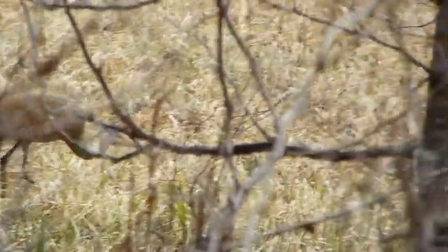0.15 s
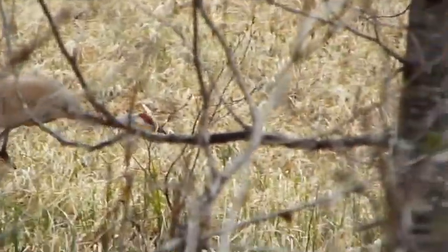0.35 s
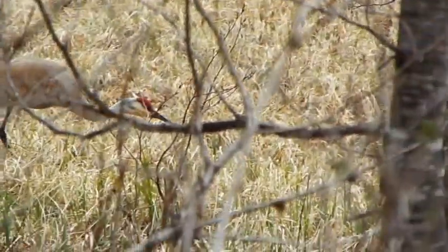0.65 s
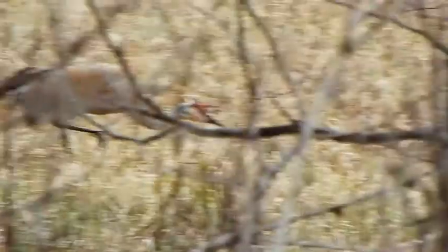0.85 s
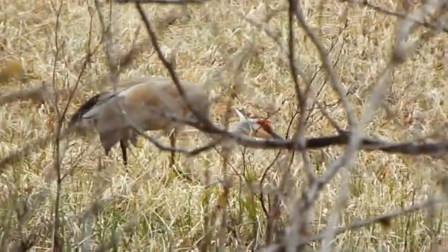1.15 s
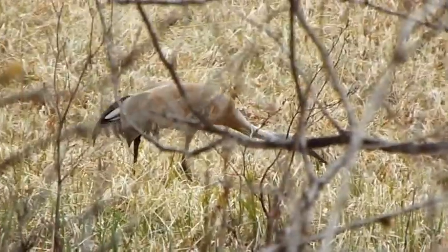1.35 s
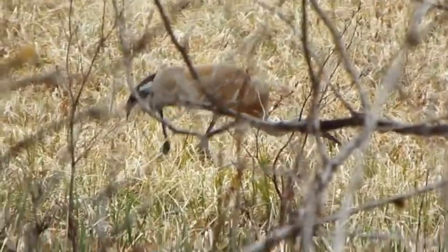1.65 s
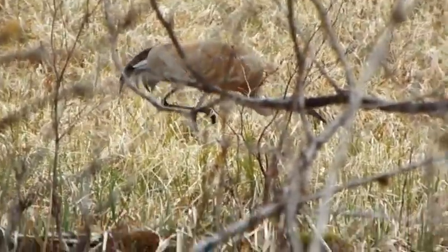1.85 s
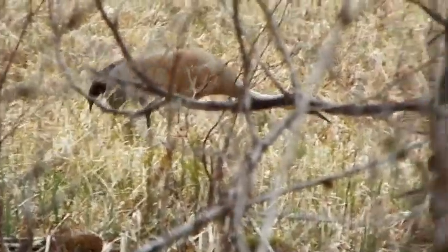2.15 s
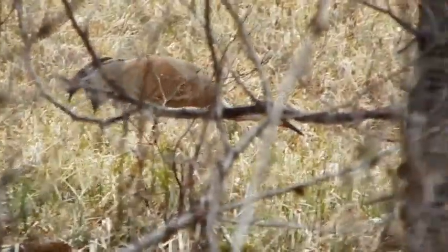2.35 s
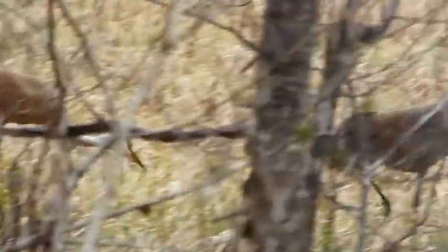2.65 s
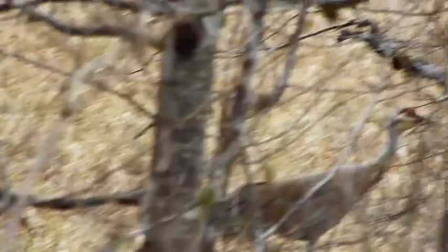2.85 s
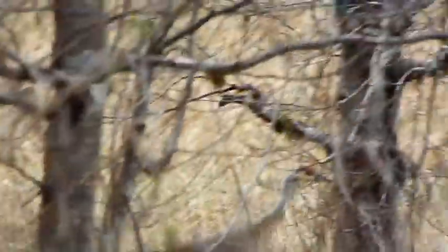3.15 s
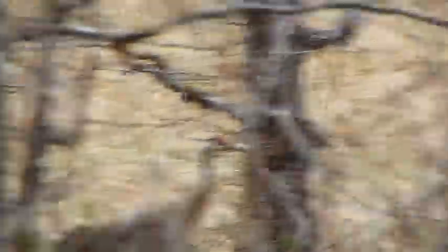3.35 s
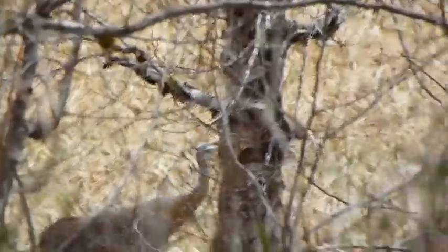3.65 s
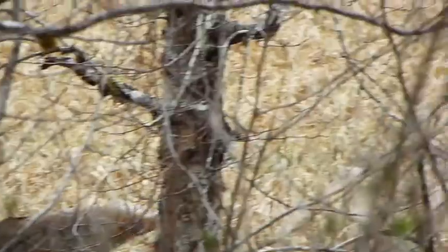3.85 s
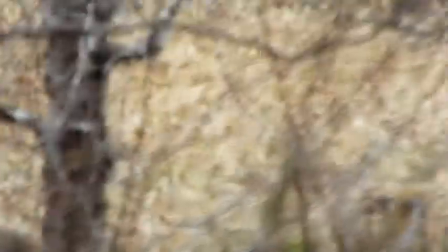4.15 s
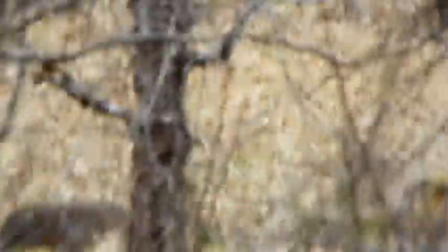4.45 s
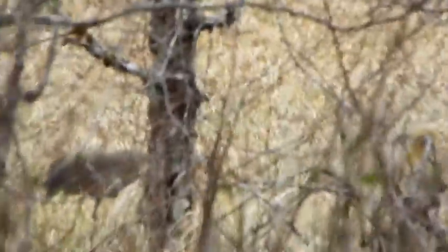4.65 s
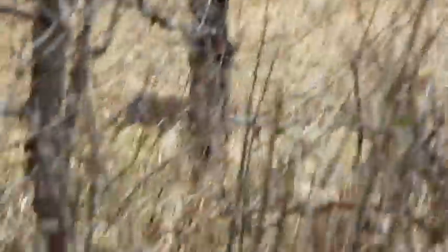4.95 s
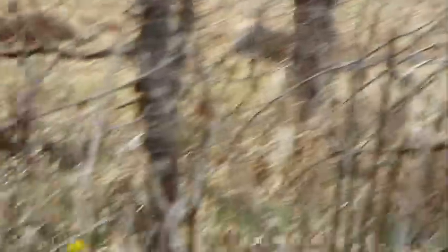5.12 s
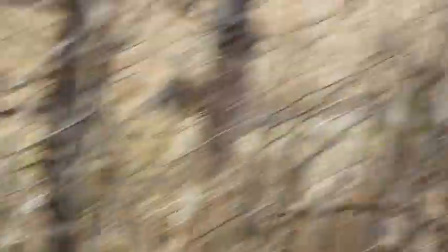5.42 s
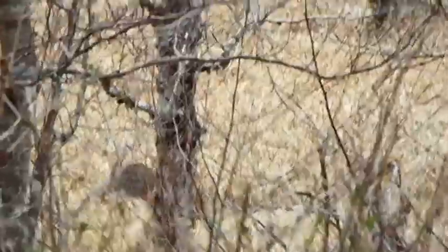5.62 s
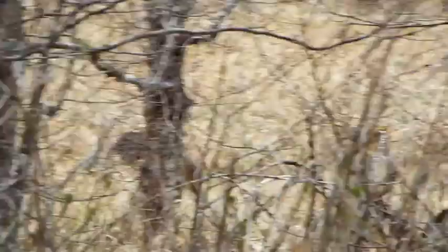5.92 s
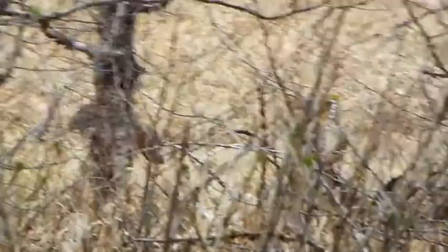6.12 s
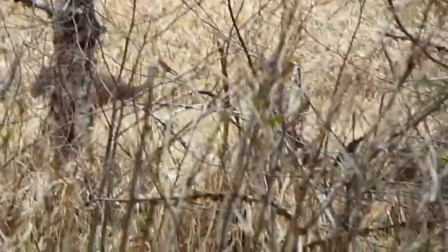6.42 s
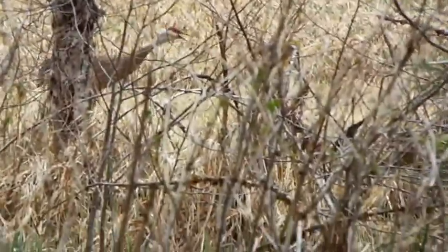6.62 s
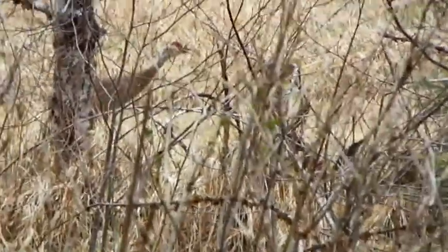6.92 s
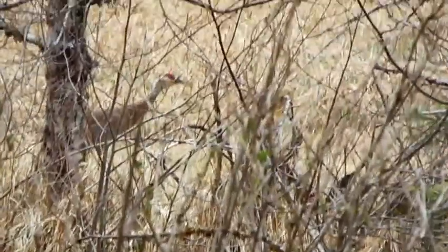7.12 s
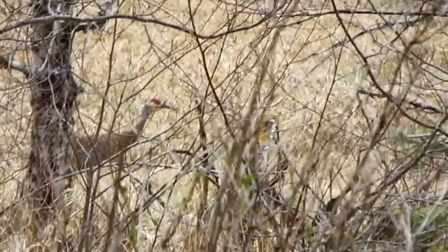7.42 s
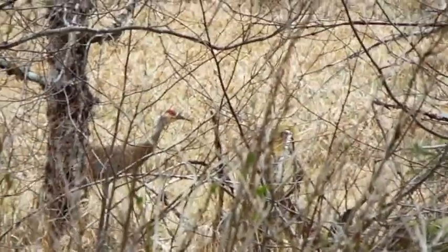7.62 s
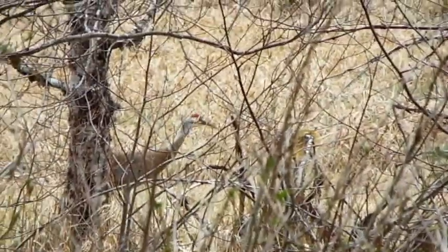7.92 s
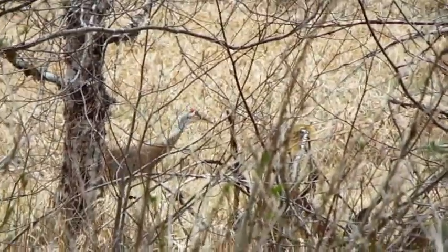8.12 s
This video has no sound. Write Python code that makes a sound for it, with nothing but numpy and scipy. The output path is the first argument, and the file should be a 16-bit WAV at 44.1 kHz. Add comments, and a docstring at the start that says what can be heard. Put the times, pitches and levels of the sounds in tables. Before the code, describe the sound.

Recorded on a camera's own stereo microphones outdoors: soft low rumble and dry-grass air, with hard, dry plastic snaps very close. A crane straight ahead rattles twice, about five seconds apart, each a half-second run of tight hollow notes that speeds up, fades and sinks, with trees ringing afterwards. Between the calls come clustered clicks, soft puffs and a small geared motor's rising and falling whir.

```python
"""A faint outdoor hush lies under everything, with plastic clicks and creaks of a hand-held camera.
A sandhill crane gives two rattling calls across a marsh: quickening runs of short bugled notes, each
led in by a low purr and answered by trees. Between the calls the camera's zoom motor whirs in three runs.
Hush and gear hiss are shaped noise, clicks are friction bursts with ringing shell modes, and
the crane is trains of uneven pulses through a windpipe filter, convolved with a noise-built woodland echo."""
import sys
import numpy as np
from scipy import signal
from scipy.fft import rfft, irfft, next_fast_len
from scipy.io import wavfile
from scipy.ndimage import uniform_filter1d, map_coordinates

SR = 44100
rng = np.random.default_rng(int(sys.argv[2]) if len(sys.argv) > 2 else 0)


def dump_mix(stems):
    """Bounce the given channels to the path in sys.argv[1] as a 16-bit WAV at rate SR."""
    frames = np.atleast_2d(stems).T  # one column per channel
    limited = np.clip(frames, -1, 1)  # hard clip at full scale
    pcm = np.round(limited * 32767).astype(np.int16)
    wavfile.write(sys.argv[1], SR, pcm)


N = 365148


def amp(db):
    """Decibels to gain."""
    return 10 ** (np.asarray(db) / 20)


def unit(x):
    """Scaled to rms 1."""
    return x / np.sqrt(np.mean(x ** 2) + 1e-20)


def burst(x):
    """Scaled to the energy of a hundredth of a second at rms 1."""
    energy = np.sum(x ** 2, axis=-1, keepdims=True)
    return x * np.sqrt(SR / 100 / (energy + 1e-20))


def along(points, hz):
    """Interpolates (frequency_hz, value) points on a log frequency axis."""
    point_hz, value = np.transpose(points)
    return np.interp(np.log(hz + 1), np.log(point_hz + 1), value)


def wobble(rate_hz, size=N):
    """A smooth random curve with rate_hz knots a second."""
    knots = rng.standard_normal(int(size * rate_hz / SR) + 4)
    fine = np.arange(0, len(knots) - 1, .25)
    return np.interp(np.arange(size) * rate_hz / SR, fine, map_coordinates(knots, [fine]))


def add(track, start_s, x):
    """Mixes x into the track from start_s, cut off at the track's end."""
    start = round(start_s * SR)
    part = track[..., start:start + x.shape[-1]]
    part += x[..., :part.shape[-1]]


def filtered(x, response):
    """x times a response of frequency."""
    n = x.shape[-1]
    m = next_fast_len(n + 8192, True)
    return irfft(rfft(x, m) * response(np.fft.rfftfreq(m, 1 / SR)), m)[..., :n]


def coloured(x, points, size=2048):
    """x through a causal, minimum-phase filter with the given (frequency_hz, level_db) shape."""
    cepstrum = irfft(np.log(amp(along(points, np.fft.rfftfreq(size, 1 / SR)))))
    # folding the cepstrum forward puts all the energy after the onset
    cepstrum[1:size // 2] *= 2
    cepstrum[size // 2:] = 0
    impulse = irfft(np.exp(rfft(cepstrum)))
    return filtered(x, lambda hz: rfft(impulse, next_fast_len(x.shape[-1] + 8192, True)))


def rush(spectrum, alike, patchy_db, size=N):
    """Stereo noise of rms 1 with patches of random gain in time and frequency, shared by both channels."""
    z = signal.stft(rng.standard_normal((2, size)), nperseg=512)[2]
    patches = uniform_filter1d(rng.standard_normal(z.shape[1:]), 6, 0)
    patches = uniform_filter1d(patches, 18, 1)
    pair = signal.istft(z * amp(patchy_db * unit(patches)), nperseg=512)[1][:, :size]
    # the mid-side balance sets how alike left and right are at each frequency
    turn = lambda hz: np.arccos(np.clip(along(alike, hz), -1, 1)) / 2
    balance = lambda hz: np.array([np.cos(turn(hz)), np.sin(turn(hz))])
    mid, side = filtered(pair, lambda hz: amp(along(spectrum, hz)) * balance(hz))
    return unit(np.array([mid + side, mid - side]))


# tone of the hush, relative spectrum: frequency_hz, level_db
HUSH_SPECTRUM = [(20, -1), (45, -8), (170, -15), (350, -17.5), (700, -21), (900, -18.5), (1300, -23),
                 (2100, -26.5), (2650, -25.5), (3600, -29.5), (5500, -23.5), (7000, -30.5), (9000, -35),
                 (16000, -38.5)]
# stereo width of the hush: frequency_hz, left_right_likeness (correlation, no unit)
HUSH_LIKENESS = [(60, -0.28), (290, 0.44), (1200, 0.56), (6800, 0.268), (15000, 0.09)]
HUSH_DB = -56.5
DIP_START_S, DIP_END_S, DIP_DB = 3.8, 5.45, -2


def hush():
    """Air moving in dry grass, over a low rumble: patchy noise that dips for a moment midway."""
    t = np.arange(N) / SR
    dip = uniform_filter1d(1.0 * ((t > DIP_START_S) & (t < DIP_END_S)), SR // 10)
    level_db = HUSH_DB + DIP_DB * dip + .35 * wobble(5)
    return amp(level_db) * rush(HUSH_SPECTRUM, HUSH_LIKENESS, patchy_db=1.1)


# runs of the zoom motor, whir before its trim: start_s, end_s, whir_db, whine_db
ZOOM_RUNS = [(3.936, 4.061, -38, -52), (4.051, 4.889, -38.5, -45.5), (4.95, 5.08, -39.5, -55.5)]
# speed of the zoom's gear wheel, which drags for a moment: time_s, speed_turns_per_s
WHEEL_SPEED = [(4.465, 21.55), (4.485, 16), (4.585, 16), (4.62, 22)]
# the lens barrel's answer to the gears: frequency_hz, level_db
BARREL = [(600, -15.5), (830, -6.5), (1000, -16.5), (1450, -27), (1750, -13), (2030, -1.5), (2150, -6.5),
          (2500, -2), (2760, 7.5), (2900, -12), (3080, 1.5), (3250, -8.5), (3600, -12), (4200, -12),
          (4800, 1), (6500, -6)]
# body of the whir, relative spectrum: frequency_hz, level_db
WHIR_BODY = [(120, -22), (260, -6), (350, -4), (620, -14), (820, -4), (1150, -17), (1900, -3), (2400, -8),
             (3600, -10), (6000, -41)]
# hiss of the sliding teeth, relative spectrum: frequency_hz, level_db
WHIR_HISS = [(1000, -43), (3000, -25), (3900, -11), (4350, -3), (4850, 1), (5100, -2.5), (5450, 2.5),
             (6000, -3), (6450, -2), (7000, -9.5), (11500, -24), (12500, -35), (15500, -45)]
# stereo lean of the motor: frequency_hz, left_over_right_db
WHIR_PAN = [(200, 2.5), (1400, -4), (2400, 3.5), (2950, 8), (4400, -6.5), (6000, -13.5), (7300, 0),
            (8700, -4), (11500, 9.5)]
START_TURN, CLIMB_SHARE = .44, .72  # where in its turn the wheel starts; share of a turn spent climbing


def zoom(mesh_hz=485, swing=0.0955, uneven=0.091, catch_db=2.0, body_db=-14, load_db=6.5,
         hardest_turn=0.48, second_gear=1.68, hum_hz=350, hum_db=-15):
    """Gears whir in the lens barrel; with each turn of a wheel their mesh tone climbs, swells and drops back."""
    track = np.zeros((2, N))
    for start_s, end_s, whir_db, whine_db in ZOOM_RUNS:
        n = round((end_s - start_s + .05) * SR)
        t = np.arange(n) / SR
        running = np.clip(t / 0.0041, 0, 1) * np.clip((end_s - start_s - t) / 0.02879 + 0.5, 0, 1)
        wheel = np.interp(start_s + t, *np.transpose(WHEEL_SPEED))
        turn = (START_TURN + np.cumsum(wheel) / SR) % 1
        climb = -np.cos(np.pi * np.interp(turn, [0, CLIMB_SHARE, 1], [0, 1, 2]))
        speed = 1 + swing * (1 + uneven * wobble(20, n)) * climb
        speed = speed + .004 * wobble(200, n) + .008 * wobble(25, n)
        mesh_phase = 2 * np.pi * np.cumsum(mesh_hz * speed) / SR
        teeth = np.zeros(n)
        for ratio in (second_gear, *range(4, 12)):
            tone = np.cos(ratio * mesh_phase + rng.uniform(0, 2 * np.pi))
            teeth += tone * amp(catch_db * wobble(60, n))
        load = np.cos(2 * np.pi * (turn - hardest_turn))
        whine = unit(coloured(teeth * amp(load_db * load), BARREL))
        hum = np.sin(2 * np.pi * np.cumsum(hum_hz * np.sqrt(speed)) / SR)
        hum = hum * amp(hum_db + 4.5 * wobble(40.1, n))
        # sliding teeth hiss, a little harder as the wheel bears on them
        hiss = rush(WHIR_HISS, [(3000, 0.117)], patchy_db=1.2, size=n)
        hiss = hiss * amp(0.74 * load + 1.5 * wobble(400, n))
        body = rush(WHIR_BODY, [(100, 0), (300, 0.73), (1400, 0.71), (3000, 0.29)], patchy_db=1.5, size=n)
        whir = amp(whir_db - 1.03) * (hiss + amp(body_db) * body)
        motor = running * (whir + amp(whine_db) * (whine + hum))
        lean = lambda hz: amp(along(WHIR_PAN, hz) * np.array([[.5], [-.5]]))
        add(track, start_s, filtered(motor, lean))
    return track


def thump(start_s=4.04, pitch_hz=315, level_db=-38, t60_s=0.081, rise_s=0.0039):
    """As the long zoom run begins, the lens mount takes up its load with one low, short ring."""
    track, t = np.zeros((2, N)), np.arange(SR // 2) / SR
    envelope = amp(level_db - 60 * t / t60_s) * (1 - np.exp(-t / rise_s))
    add(track, start_s, envelope * np.sin(2 * np.pi * pitch_hz * t))
    return track


# modes of a small metal part: pitch_hz, level_db, t60_s
JINGLE_MODES = [(5512, -50, 0.2195), (6072, -51, 0.24)]


def jingle(start_s=5.79, rise_s=0.018, flutter_db=3):
    """A small metal part, perhaps a strap ring, is shaken by one click and rings on thinly."""
    track, t = np.zeros((2, N)), np.arange(SR // 4) / SR
    for pitch_hz, level_db, t60_s in JINGLE_MODES:
        envelope = amp(level_db - 60 * t / t60_s + flutter_db * wobble(91.3, len(t)))
        envelope = envelope * (1 - np.exp(-t / rise_s))
        ring = np.sin(2 * np.pi * pitch_hz * t + rng.uniform(0, np.pi, (2, 1)))
        add(track, start_s, envelope * ring)
    return track


def puffs(table, colour, apart, rise_share=0.37):
    """Brief dying bursts of coloured noise, partly shared between left and right."""
    track, t = np.zeros((2, N)), np.arange(SR // 6) / SR
    for start_s, level_db, decay_s in table:
        noise = rng.standard_normal(len(t)) + apart * rng.standard_normal((2, len(t)))
        envelope = np.exp(-t / decay_s) * (1 - np.exp(-t / (rise_share * decay_s)))
        add(track, start_s, amp(level_db) * burst(coloured(noise * envelope, colour)))
    return track


# soft dull puffs, one of them the low burst of a loud, overloaded click: start_s, level_db, decay_s
DULL_PUFFS = [(1.56, -54, 0.0179), (1.842, -41, 0.00092), (3.153, -46.5, 0.021), (3.272, -45.5, 0.0024),
              (3.329, -50.5, 0.01732), (3.955, -46, 0.0127), (4.03, -43.5, 0.01), (5.035, -47, 0.01307),
              (5.854, -53, 0.0087), (8.003, -51, 0.007)]
# tone of a dull puff: frequency_hz, level_db
DULL_COLOUR = [(60, -18), (170, -6), (300, -4.5), (450, -6.5), (650, -9), (1200, -13), (2500, -24),
               (8000, -38)]


def dull_puffs():
    """Soft dull puffs: short noise, strongest in the low mids, that swells briefly and dies."""
    return puffs(DULL_PUFFS, DULL_COLOUR, apart=0.49)


# faint puffs of bright noise, two of them just before hard clicks: start_s, level_db, decay_s
BRIGHT_PUFFS = [(2.6146, -48, .0012), (3.217, -47, .003), (3.41, -45, 0.00274), (3.8885, -47.5, 0.00156),
                (3.161, -48.5, 0.0043), (5.494, -51.5, 0.014), (5.792, -51, 0.043)]
# tone of a bright puff: frequency_hz, level_db
BRIGHT_COLOUR = [(1000, -8), (3500, -11), (5000, -5.5), (5800, -6), (6500, -10), (8000, -22), (15000, -37)]


def bright_puffs():
    """Faint puffs of bright noise, wider in stereo than the dull ones."""
    return puffs(BRIGHT_PUFFS, BRIGHT_COLOUR, apart=0.86)


# clicks of the camera body, levels before the gains below; clack_hz is where the clack rings most,
# and clack and knock lean half as far: start_s, snap_db, top_db, clack_db, knock_db, clack_hz, left_over_right_db
CLICKS = [(0.3978, -40, -58.5, -45.0, -77, 2070, -6), (0.7581, -33.5, -45, -33, -45.5, 1780, 1),
          (1.3635, -51, -69.5, -47, -60, 1920.0, -8), (1.4617, -39.5, -57.5, -41.5, -50.5, 2070, -5.5),
          (1.5531, -28.5, -49, -32, -48, 2161, -6.5), (1.556, -21.5, -44, -32, -44, 1963, -3.5),
          (1.8427, -20.0, -27, -25.5, -45, 2590, -6), (1.873, -34, -61, -36, -52, 1630, -6),
          (2.0082, -25, -49, -34, -48, 1942, -3.5), (2.719, -33.5, -45, -31, -45, 2004, -2),
          (2.9593, -43, -69, -42.5, -52.5, 1457, -2), (3.0072, -29.0, -36, -35, -63, 1716, -2.0),
          (3.0339, -40, -56.0, -45.5, -59, 1695, -5.0), (3.0638, -29.5, -39.5, -45, -58.5, 2320, -3),
          (3.2223, -22.0, -33, -40.0, -52, 1646, -3.5), (3.282, -19, -34, -31.5, -48.5, 2146, -7.5),
          (3.2827, -23, -27.5, -38, -50, 2153, 4), (3.4161, -22, -36, -41, -54, 1850, -2.5),
          (3.9619, -25.5, -53.5, -40.5, -64.5, 2080, -11), (4.0415, -34.5, -58, -52, -63, 2100, -8),
          (4.8443, -20.5, -31, -28.5, -52, 2084, 2), (4.9583, -31, -56, -28, -45, 2180, -2),
          (4.9724, -26, -47, -37.5, -60, 2588, -9.5), (5.0454, -27, -58, -43, -60, 2400.0, -6.5),
          (5.3201, -51, -75, -46, -53, 1287, -4.5), (5.6671, -40, -66.5, -40.5, -57.5, 1820, -2),
          (5.7847, -28, -46.5, -33.5, -46, 1830, 1), (7.6843, -42.5, -57, -46.5, -54.5, 1944, -3.5),
          (8.1571, -30, -50, -40.5, -60, 2156, 0)]
# modes of the plastic shell, each strike scatters pitch and level: pitch_hz, level_db, t60_s
SHELL_MODES = [(538, -2.5, 0.014), (911, -17, 0.039), (1297, -2, 0.02), (1520, -4.5, 0.021),
               (1993, -3, 0.01977), (2376.7, -3.5, 0.018), (2705.4, -3.5, 0.021304)]
# tone of the plastic's snap: frequency_hz, level_db
SNAP_COLOUR = [(300, -50.5), (1000, -38), (2000, -18), (3100, -32.5), (3950, -5), (4300, -6), (4700, 4),
               (5250, 6.5), (6100, 2.5), (6800, -4.5), (7700, -12), (8700, -16.5), (10300, -40),
               (15500, -63.5)]
# tone of the thin top-treble burst of a click, strongest where it overloads the input: frequency_hz, level_db
TOP_COLOUR = [(3000, -27), (7000, 0), (8300, 6), (10300, -4.5), (11800, -2), (15500, -15)]
# tone of the dry crack under the shell's modes: frequency_hz, level_db
CRACK_COLOUR = [(300, -17.5), (850, -19.5), (1250, 3), (1550, -4), (2000, 2), (2700, -7), (3200, -2),
                (3900, 3), (5200, -32), (10000, -51)]
SNAP_GAIN_DB, TOP_GAIN_DB = -1.2, -3.5
CLACK_GAIN_DB, KNOCK_GAIN_DB = 1.24, 1  # the shell's upper modes; its two lowest
HOLLOW_HZ, HOLLOW_T60_S = 1556.3, 0.22  # a faint ring that lingers in the body after a click


def clicks(slip_s=0.0012, ring_s=0.005818, ring_db=-24, rise_s=0.00012, focus_db_per_octave=11, apart=1.37,
           crack_share=0.93, top_share=0.65, hollow_db=-29):
    """Plastic slips under the fingers: snap, crack and shell modes reach each microphone by their own path."""
    track, t = np.zeros((2, N)), np.arange(SR // 8) / SR
    mode_hz, mode_db, t60_s = np.transpose(SHELL_MODES)[:, :, None]
    attack = 1 - np.exp(-t / rise_s)
    slip = attack * (np.exp(-t / slip_s) + amp(ring_db) * np.exp(-t / ring_s))
    top_envelope = attack * np.exp(-t / (top_share * slip_s))
    hollow = burst(attack * np.sin(2 * np.pi * HOLLOW_HZ * t) * amp(-60 * t / HOLLOW_T60_S))
    for start_s, snap_db, top_db, clack_db, knock_db, clack_hz, pan_db in CLICKS:
        # where the shell is pressed decides what rings most
        focus = lambda hz: -focus_db_per_octave * np.abs(np.log2(hz / clack_hz))
        shared, own = rng.standard_normal(len(t)), rng.standard_normal((2, len(t)))
        friction = shared + apart * own
        snap = amp(snap_db + SNAP_GAIN_DB) * burst(coloured(friction * slip, SNAP_COLOUR))
        top = amp(top_db + TOP_GAIN_DB) * burst(coloured(friction * top_envelope, TOP_COLOUR))
        crack_colour = [(hz, db + focus(hz)) for hz, db in CRACK_COLOUR]
        crack = burst(coloured((shared + 0.5 * own) * slip, crack_colour))

        phase = rng.uniform(0, 2 * np.pi, mode_hz.shape) + rng.normal(0, 0.63, (2, len(SHELL_MODES), 1))
        tuning = 1 + rng.normal(0, 0.023, mode_hz.shape)
        swell = 1 - np.exp(-t * mode_hz)
        envelope = swell * amp(mode_db + rng.normal(0, 1.5, mode_hz.shape) - 60 * t / t60_s)
        modes = envelope * np.sin(2 * np.pi * mode_hz * tuning * t + phase)
        upper = (modes * amp(focus(mode_hz)))[:, 2:]
        clack = burst(burst(upper.sum(axis=1)) + crack_share * crack) + amp(hollow_db) * hollow
        clack = amp(clack_db + CLACK_GAIN_DB) * clack
        knock = amp(knock_db + KNOCK_GAIN_DB) * burst(modes[:, :2].sum(axis=1))

        bright = amp([[pan_db / 2], [-pan_db / 2]]) * (snap + top)
        dull = amp([[pan_db / 4], [-pan_db / 4]]) * (clack + knock)
        add(track, start_s, bright + dull)
    return track


# how long the trees ring: frequency_hz, t60_s
WOODS_T60 = [(1050, 3), (2100, 3), (3500, 1.4), (5500, 1.57), (10000, 0.1)]
# tone of the trees' answer: frequency_hz, level_db
WOODS_COLOUR = [(500, 0), (1070, -3), (1600, -10.5), (2130, -4), (5500, -11.5), (10000, -15)]
# what the nearby trunks scatter back: frequency_hz, level_db
TRUNKS = [(1050, 2), (2100, 0), (5500, -1), (10000, -3.5)]


def woods(near_db=-7.0, near_t60_s=0.59, ground_db=-11, ground_t60_s=0.065, stand_db=-14, stand_s=0.0396,
          stand_width_s=0.0041, far_db=-5, spread=0.12):
    """Ground and trunks scatter the call at once, a stand of trees throws it back, the marsh's edge rings on."""
    hz, t, z = signal.stft(rng.standard_normal((2, 3 * SR // 2)), SR, nperseg=256)
    fade_db = along(WOODS_COLOUR, hz)[:, None] - 60 * t / along(WOODS_T60, hz)[:, None]
    far = signal.istft(z * amp(fade_db), SR, nperseg=256)[1]
    t = np.arange(far.shape[-1]) / SR
    far = amp(far_db) * far * (1 - np.exp(-t / 0.0085)) / np.sqrt(.13 * SR)

    ground = amp(-60 * t / ground_t60_s) * (1 - np.exp(-t / .002))
    trunks = amp(-60 * t / near_t60_s)
    stand = np.exp(-((t - stand_s) / stand_width_s) ** 2)
    paths = [(ground_db, ground), (near_db, trunks), (stand_db, stand)]
    power = sum((amp(db) * shape / np.linalg.norm(shape)) ** 2 for db, shape in paths)
    near = coloured(rng.standard_normal(far.shape) * np.sqrt(power), TRUNKS)
    return [np.array([mid + spread * side, mid - spread * side]) for mid, side in (near, far)]


# resonances of windpipe and bill: frequency_hz, level_db
THROAT = [(300, -25), (600, -13), (780, -2), (1500, -2.5), (2100, -5), (2800, -18), (3300, -10), (4450, -5),
          (4750, 0.5), (5700, 0.5), (6200, -4), (7000, -7), (7550, -17), (8200, -16), (11000, -27.5),
          (15500, -42)]


def note(pitch_hz, length_s, treble_db, unsteady, sag=0.11, swell=0.075, rough=0.24, release_s=0.00221,
         smear_s=0.000434, rasp=1.0):
    """One puff through the syrinx: sharp, uneven pulses that sag in pitch and die away in the windpipe."""
    t = np.arange(SR // 16) / SR
    cycle = np.arange(0, 30)
    jitter = unsteady * rng.standard_normal(len(cycle))
    periods = (1 + sag * np.tanh(cycle / pitch_hz / length_s - .5) + jitter) / pitch_hz
    times = np.cumsum(periods) - periods[0]

    def push(u):
        """Breath pressure: a quick swell, then a soft release."""
        let_go = np.exp(-np.logaddexp(0, (u - 0.73 * length_s) / release_s))
        return let_go * (1 - 0.69 * np.exp(-u / (swell * length_s)))

    sizes = push(times) * amp(rng.normal(0, 0.82, len(cycle)))
    pulses = sizes @ np.sinc((t - times[:, None]) * SR - 8)
    breath = burst(push(t) * rng.standard_normal(len(t)))
    voice = coloured(burst(pulses) + rough * breath, THROAT)
    # the treble lags, by smear_s at 5 kHz, which spreads each pulse over its cycle
    voice = filtered(voice, lambda hz: np.exp(-1j * np.pi * smear_s * hz ** 2 / 5000))
    horn = filtered(voice, lambda hz: 1 / (1 + (hz / 2800) ** 12))
    # air tears past the membranes and makes the treble hoarse
    air = coloured(push(t) * rng.standard_normal(len(t)), THROAT)
    air = air - filtered(air, lambda hz: 1 / (1 + (hz / 2400) ** 8))
    treble = burst(burst(voice - horn) + rasp * burst(air))
    return burst(horn) + amp(treble_db) * treble


# notes of the two rattles, which quicken, fade and at last sink; treble is relative to the note's low part:
# start_s, pitch_hz, length_s, level_db, treble_db
NOTES = [(1.5174, 1079, 0.0058, -40.5, -2), (1.593, 1080, 0.00882, -36.5, -2.5),
         (1.658, 1072, 0.0088, -37, -1), (1.7184, 1084, 0.0082, -35.5, -2.5),
         (1.773, 1060, 0.0081, -39, 0.5), (1.821, 1050, 0.006, -42, 2.5), (1.8635, 893.3, 0.006, -50, 2.5),
         (1.8954, 844.7, 0.00506, -47.5, 4), (6.6392, 1067, 0.0038, -36.5, 3),
         (6.717, 1057, 0.006947, -33.5, 4.5), (6.7853, 1058, 0.007208, -34, 4),
         (6.8466, 1027, 0.0051, -37.5, 6), (6.9011, 1036, 0.006, -39.5, 7.5),
         (6.9424, 985.6, 0.00405, -41.5, 7), (6.9839, 890.6, 0.00395, -44, 4)]
# the low purr before each rattle: start_s, pitch_hz, length_s, level_db
PURRS = [(1.42, 684, 0.03, -51.5), (6.531, 737, 0.006656, -53.5), (6.54, 695, 0.027, -46.5)]
# nearby echo of the notes, as the bird walks into a more open spot: time_s, echo_db
NEAR_ECHO = [(1.5, 4.5), (6.6, 0)]
PURR_TREBLE_DB, PURR_ECHO_DB = -0.5, 2
PURR_JITTER, NOTE_JITTER = .075, .025  # scatter of the period from cycle to cycle, as a share of it


def crane(echo_count=5):
    """Purrs and rattles, each note answered by the trees; the nearby echo changes as the bird walks."""
    calls = np.zeros((2, N))
    echoes = [woods() for _ in range(echo_count)]
    notes = [(*purr, PURR_TREBLE_DB, PURR_ECHO_DB, PURR_JITTER) for purr in PURRS]
    notes += [(*row, np.interp(row[0], *np.transpose(NEAR_ECHO)), NOTE_JITTER) for row in NOTES]
    for k, (start_s, pitch_hz, length_s, level_db, treble_db, echo_db, unsteady) in enumerate(notes):
        direct = amp(level_db) * note(pitch_hz, length_s, treble_db, unsteady)
        near, far = echoes[k % echo_count]
        add(calls, start_s, direct)
        add(calls, start_s, signal.fftconvolve(direct[None], amp(echo_db) * near + far, axes=1))
    return calls


def scene():
    """The marsh, the motor, the clicks and small puffs, and the bird straight ahead."""
    small_noises = thump() + jingle() + dull_puffs() + bright_puffs() + clicks()
    return hush() + zoom() + small_noises + crane()


def record(dry, full_scale=1, top_hz=16150):
    """The input clips whatever exceeds full scale; the camera keeps nothing above its band limit."""
    clipped = np.clip(dry, -full_scale, full_scale)
    return filtered(clipped, lambda hz: np.clip((top_hz - hz) / 700 + .5, 0, 1) ** 2)


dry = scene()
out = record(dry)
dump_mix(out)
```